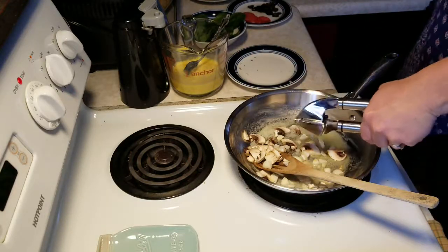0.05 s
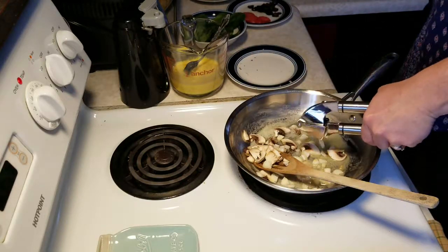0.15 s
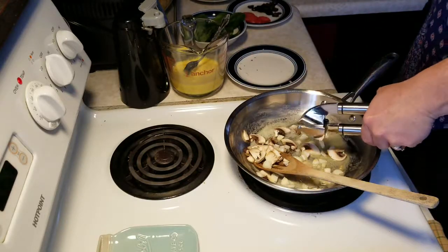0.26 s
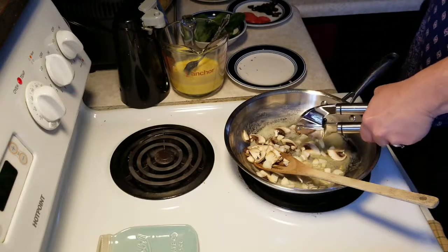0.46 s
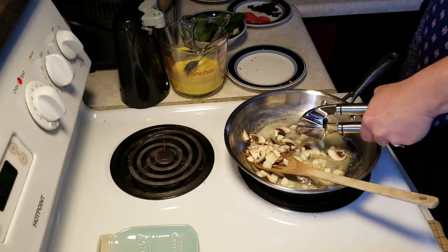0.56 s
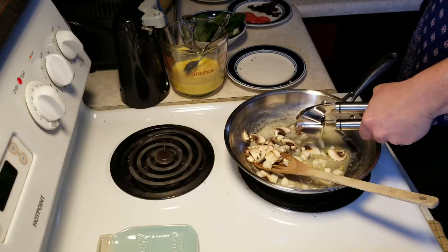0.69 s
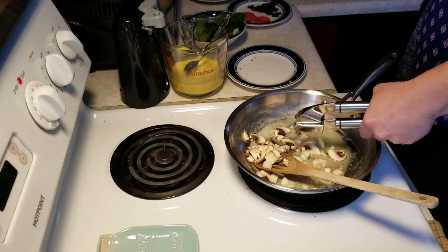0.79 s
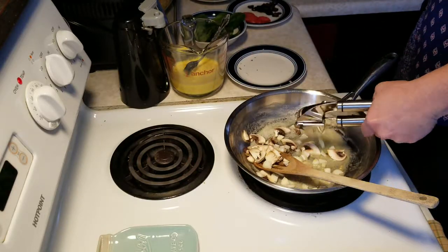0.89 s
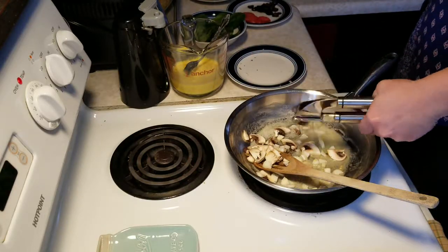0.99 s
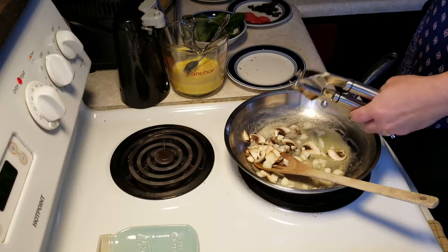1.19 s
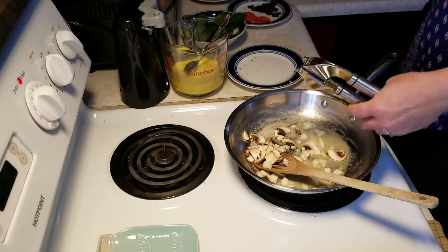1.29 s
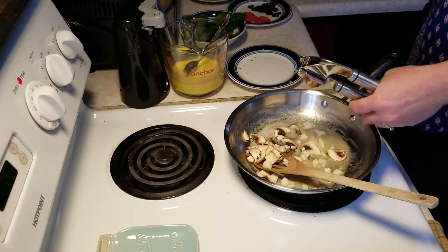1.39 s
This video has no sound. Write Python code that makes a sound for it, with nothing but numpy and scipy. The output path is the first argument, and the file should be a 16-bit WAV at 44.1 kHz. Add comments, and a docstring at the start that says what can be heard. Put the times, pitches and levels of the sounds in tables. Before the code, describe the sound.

A metal garlic press scrapes lightly with a faint ring at the start, then skids and hits a steel pan with a sharp clink at about 0.25 seconds. The pan's ring fades by about one second, while small hinge ticks come and go. A soft, dull knock lands at 1 second, followed by very faint rubbing. A low appliance hum fills the small kitchen throughout.

```python
"""Garlic press against a steel pan

A steel garlic press scrapes lightly, then its hinged hopper swings, skids and clashes on a steel pan.
Contacts are noise bursts; decaying modes ring briefly in the press, longer in the pan.
Small hinge ticks and a dull knock follow as the press is lifted away.
A low appliance hum fills the small kitchen."""
import sys
import numpy as np
from scipy import signal
from scipy.fft import rfft, irfft, next_fast_len
from scipy.io import wavfile
from scipy.ndimage import map_coordinates

SR = 44100
rng = np.random.default_rng(int(sys.argv[2]) if len(sys.argv) > 2 else 0)


def file_out(sig):
    """Save sig as 16-bit WAV at sys.argv[1]."""
    # one column per channel
    cols = np.atleast_2d(sig).T
    # limit, then scale
    lim = np.clip(cols, -1, 1)
    pcm = np.round(lim * 32767).astype(np.int16)
    wavfile.write(sys.argv[1], SR, pcm)


N = 63945

# Stereo image of the steel sounds. Each row: frequency in Hz, left-right correlation.
STEEL_CORRELATION = [(500, .4), (2000, .45), (5000, 0.17), (12000, -.1)]


def amp(db):
    """Decibels to gain."""
    return 10 ** (np.asarray(db) / 20)


def unit(x):
    """Scale to rms 1."""
    return x / np.sqrt(np.mean(x ** 2) + 1e-20)


def along(points, hz):
    """Interpolate (Hz, value) points on a log frequency axis."""
    knots_hz, values = np.transpose(points)
    return np.interp(np.log(hz + 1), np.log(knots_hz + 1), values)


def since(start_s):
    """Seconds since start_s, zero before it."""
    return np.maximum(np.arange(N) / SR - start_s, 0)


def wobble(rate_hz):
    """Smooth random curve, rate_hz knots a second."""
    return map_coordinates(rng.standard_normal(2048), [np.arange(N) * rate_hz / SR], mode="wrap")


def balance(left_db):
    """Stereo gains for a left-minus-right level."""
    return amp(np.array([[left_db], [-left_db]]) / 2)


def filtered(x, response):
    """Apply a gain given as a function of Hz."""
    size = next_fast_len(N + SR // 2)
    return irfft(rfft(x, size) * response(np.fft.rfftfreq(size, 1 / SR)), size)[..., :N]


def noise(colour, correlation=STEEL_CORRELATION):
    """Coloured stereo noise, rms 1."""
    def mid_side_gains(hz):
        angle = np.arccos(np.clip(along(correlation, hz), -1, 1)) / 2
        return amp(along(colour, hz)) * [np.cos(angle), np.sin(angle)]
    mid, side = filtered(rng.standard_normal((2, N)), mid_side_gains)
    return unit(np.array([mid + side, mid - side]))


def resonant_noise(peaks):
    """Stereo noise through (Hz, width in Hz, dB) resonances, rms 1."""
    def response(hz):
        return sum(amp(db) * (1j * hz * width_hz / (peak_hz ** 2 - hz ** 2 + 1j * hz * width_hz)) ** 2
                   for peak_hz, width_hz, db in peaks)
    return unit(filtered(noise([(20, 0)]), response))


def swell(peak_s, db, rise_s, t60_s):
    """Slide envelope: climbs 30 dB in rise_s to its peak, then decays."""
    ahead_s = np.maximum(peak_s - np.arange(N) / SR, 0)
    return amp(db - 30 * ahead_s / rise_s - 60 * since(peak_s) / t60_s)


def mode(start_s, hz, t60_s, rise_s=.004, hold_s=0, split_hz=0, twin_gain=0):
    """Wavering stereo mode: rise, hold, decay; a close twin makes it beat."""
    t = since(start_s)
    spread_rad = .67 * rng.choice([-1, 1]) * np.array([[1], [-1]])
    phase = 2 * np.pi * (hz * t + rng.random()) + spread_rad
    fall_db = -60 * np.maximum(t - hold_s, 0) / t60_s
    waver_db = 2.1 * np.array([wobble(28), wobble(28)])
    envelope = amp(fall_db + waver_db) * (1 - np.exp(-t / rise_s))
    return envelope * (np.sin(phase) + twin_gain * np.sin(phase + 2 * np.pi * split_hz * t))


def bursts(contacts, colour, t60_s):
    """Sharp (s, dB) contacts as fast-decaying noise, summed in power."""
    power = sum((since(start_s) > 0) * amp(db - 60 * since(start_s) / t60_s) ** 2
                for start_s, db in contacts)
    return np.sqrt(power) * noise(colour)


def in_kitchen(x, wet_db):
    """Direct sound plus the kitchen's diffuse tail."""
    # Room decay. Each row: frequency in Hz, T60 in seconds.
    decay = [(300, .4), (1000, 0.42), (2100, 0.43), (3600, 0.36), (6000, 0.23), (9000, 0.19), (13000, 0.31)]
    hz, t, spectrum = signal.stft(rng.standard_normal((2, SR // 2)), SR, nperseg=256)
    tail = signal.istft(spectrum * amp(-60 * t / along(decay, hz)[:, None]), SR, nperseg=256)[1]
    mid, side = signal.fftconvolve(x, tail / np.linalg.norm(tail[0]), axes=1)[:, :N]
    side = filtered(side, lambda hz: np.sqrt(np.clip(1 - along(STEEL_CORRELATION, hz), 0, 1)))
    return x + amp(wet_db) * np.array([mid + side, mid - side]) / np.sqrt(2)


def appliance_hum():
    """Unsteady appliance tones over a low rush of air."""
    # Hum tones. Each row: frequency in Hz, rms level in dB.
    tones = [(86.1, -65.5), (119.6, -53.5), (172, -71.5), (209.9, -60.5), (236.9, -65), (409.1, -71.5)]
    # Air spectrum. Each row: frequency in Hz, relative level in dB.
    air_colour = [(15, -44.5), (25, -13), (59, -10.5), (96, -3), (130, -8), (170, -8), (241, -7.5),
                  (324, -12.5), (361, -17), (513, -15), (1150, -39), (2030, -36), (2390, -41.5),
                  (2590, -39.5), (3130, -47), (3680, -45.5), (4570, -45), (7220, -34.5), (9210, -47),
                  (14200, -48.5), (15800, -52)]
    # Air stereo image. Each row: frequency in Hz, left-right correlation.
    air_correlation = [(120, 0.98), (260, .75), (600, 1), (2000, .2), (10000, .1)]
    waver_db, drift_rad = 2.5, .3
    t = np.arange(N) / SR
    hum = 0
    for hz, db in tones:
        gain = np.sqrt(2) * amp(db + waver_db * wobble(9.63))
        hum += gain * np.sin(2 * np.pi * (hz * t + rng.random()) + drift_rad * wobble(12))
    return hum + amp(-53.5) * noise(air_colour, air_correlation)


def scrapes():
    """Grainy steel-on-steel friction swells and fades with each slide."""
    # Slides. Each row: peak time in seconds, level in dB, rise in seconds, T60 in seconds.
    slides = [(.003, -43, 0.0033, 0.089), (.06, -47.5, 0.072, 0.14), (0.221, -52, 0.027, .06),
              (.245, -32.5, 0.039, 0.18), (.365, -54.5, 0.078, 0.5), (.48, -56.5, 0.17, 0.2),
              (.55, -61.5, 0.025, 0.21), (.605, -61.5, 0.037, 0.12), (.695, -56.5, .06, 0.076),
              (1.24, -67.5, .12, 0.84)]
    # Friction spectrum. Each row: frequency in Hz, relative level in dB.
    colour = [(300, -34), (1000, -15.5), (2200, -7.5), (3600, -9.5), (4800, -10.5), (6400, -4),
              (8000, -12.5), (9000, -12.5), (10500, -9), (11600, -6.5), (13700, -12), (15800, -0.5)]
    envelope = sum(swell(*slide) for slide in slides)
    grain_db = 2.5 * wobble(rate_hz=600)
    return in_kitchen(envelope * unit(amp(grain_db)) * noise(colour), wet_db=4)


def handling_rubs():
    """Soft, dull rubbing as the press is handled."""
    # Rubs. Each row: peak time and 1/e half-length in seconds, centre and width in Hz, level in dB.
    rubs = [(0.113, 0.17, 705, 208, -58.5), (1.25, 0.016, 2040, 352, -73), (1.274, 0.022, 2164, 351, -72),
            (1.44, 0.047, 1590, 705, -74)]
    t = np.arange(N) / SR
    return sum(amp(db) * np.exp(-((t - peak_s) / half_s) ** 2) * resonant_noise([(hz, width_hz, 0)])
               for peak_s, half_s, hz, width_hz, db in rubs)


def hopper_ring():
    """Light touches ring the loose hopper."""
    # Touches. Each row: start in seconds, level in dB, rise in seconds.
    touches = [(.028, -44, .02), (.062, -37, .025)]
    # Hopper modes. Each row: frequency in Hz, relative level in dB, T60 in seconds.
    modes = [(1378, -10, .34), (2285, -1, .36), (3413, -17, .22), (4705, -1, .16), (5986, -9, .17),
             (6702, -11, .17), (8107, -18, .17)]
    return sum(amp(touch_db + db) * mode(start_s, hz, t60_s, rise_s)
               for start_s, touch_db, rise_s in touches for hz, db, t60_s in modes)


def hinge_ticks():
    """The hinge clicks as the press moves."""
    # Ticks. Each row: start in seconds, level in dB.
    ticks = [(.148, -55.5), (.199, -48), (.455, -56), (.487, -46), (.548, -54), (.592, -65), (.746, -55),
             (.7805, -47), (.789, -64), (.9461, -46.5), (.982, -61)]
    # Tick spectrum. Each row: frequency in Hz, relative level in dB.
    colour = [(500, -27), (2000, -14.5), (5000, -13), (6600, -1), (8800, -12.5), (11500, -0.5),
              (15800, -3.5)]
    return in_kitchen(bursts(ticks, colour, t60_s=.024), wet_db=-1.5)


def skid():
    """A damped ping at first touch, then steel squeals over steel into the blow."""
    # Squeal resonances. Each row: centre in Hz, width in Hz, relative level in dB.
    peaks = [(2285, 40, -12), (5990, 300, -4), (6600, 250, -1), (12970, 140, -6), (13720, 120, 3),
             (14330, 110, 1), (15680, 140, -1)]
    touch_s = .213
    ping = amp(-42.5) * mode(touch_s, hz=2285, t60_s=.054, rise_s=.0032, hold_s=.012)
    envelope = (since(touch_s) > 0) * swell(peak_s=.2426, db=-32.5, rise_s=.058, t60_s=.21)
    return ping + envelope * resonant_noise(peaks)


def clash():
    """The press chatters against the pan."""
    # Contacts. Each row: start in seconds, level in dB.
    contacts = [(.2525, -23), (.2548, -22), (.2578, -21), (.2615, -20.5), (.2665, -27), (.2735, -26)]
    # Contact spectrum. Each row: frequency in Hz, relative level in dB.
    colour = [(100, -30.5), (250, -16.5), (450, -16.5), (600, -9), (830, -22), (1100, -14), (1290, -8.5),
              (1500, -14), (2400, -9), (3400, -22), (4400, -6.5), (4900, -17), (5400, -5.5), (7000, -12.5),
              (8600, -9), (9000, -19), (10500, -21.5), (11200, -9.5), (13000, -8.5), (15800, -12)]
    return in_kitchen(bursts(contacts, colour, t60_s=.036), wet_db=-1)


def press_ring(strike_s):
    """The blow rings the press, high and brief."""
    # Press modes. Each row: frequency in Hz, relative level in dB, T60 in seconds, left minus right in dB.
    modes = [(1284, -35, .26, 0), (4500, -34, .24, 0), (5001, -46, .5, 0), (5460, -29, .27, -6),
             (6606, -38, .24, 0), (7461, -33, .28, -2), (7928, -40, .34, 0), (8526, -31, .25, -6),
             (9232, -44, .42, 0), (11112, -28, .38, -1), (11890, -33, .18, 0), (12326, -32, .18, 0),
             (12944, -28, .17, -6), (13678, -30, .27, -2), (13706, -32, .27, -2), (14280, -34, .23, 0),
             (15690, -35, .16, 0)]
    return amp(3.5) * sum(amp(db) * balance(left_db) * mode(strike_s, hz, t60_s)
                          for hz, db, t60_s, left_db in modes)


def pan_ring(strike_s):
    """The blow rings the pan in longer, beating mode pairs."""
    # Pan modes. Each row: frequency in Hz, relative level in dB, T60 in seconds, hold in seconds,
    # twin offset in Hz, twin gain from 0 to 1.
    modes = [(1669, -49, .33, .16, 12, .4), (2515, -41, .74, .17, 5, .05), (2815, -49, .75, .09, 5, .2),
             (4075, -50.5, .54, .14, 3, .1), (4145, -52, .72, .19, 3, .1), (5840, -43.5, .68, .16, 4.1, .5),
             (7623, -45.5, .64, .19, 5, .6), (9464, -50.5, .58, .08, 6, .2), (11510, -42, .42, .07, 6, .2)]
    return amp(1.5) * sum(
        amp(db) * mode(strike_s, hz, t60_s, hold_s=hold_s, split_hz=split_hz, twin_gain=twin_gain)
        for hz, db, t60_s, hold_s, split_hz, twin_gain in modes)


def knock():
    """A dull knock just after the last tick: one damped low sine."""
    hz, db, rise_s, t60_s = 114, -42, .0067, .18
    t = since(start_s=1)
    return amp(db - 60 * t / t60_s) * (1 - np.exp(-t / rise_s)) * np.sin(2 * np.pi * hz * t)


def scene():
    """Contact sounds slightly left, with ringing steel and rubs, over the hum."""
    strike_s = .255
    contacts = scrapes() + hinge_ticks() + skid() + clash() + knock()
    ringing = hopper_ring() + press_ring(strike_s) + pan_ring(strike_s)
    return balance(left_db=.5) * contacts + ringing + handling_rubs() + appliance_hum()


def record(dry):
    """Steep low-pass at the top of the treble."""
    cutoff_hz, edge_hz = 15820, 150
    return filtered(dry, lambda hz: np.clip((cutoff_hz - hz) / edge_hz + .5, 0, 1))


dry = scene()
out = record(dry)
file_out(out)
```